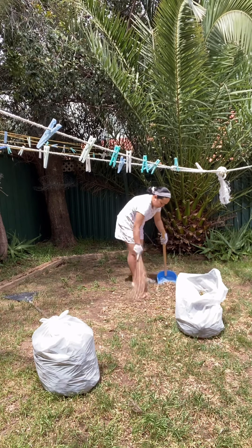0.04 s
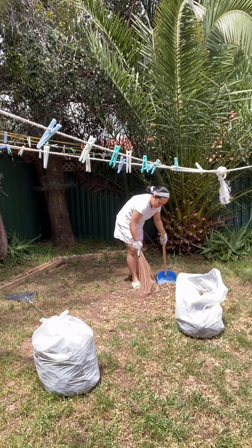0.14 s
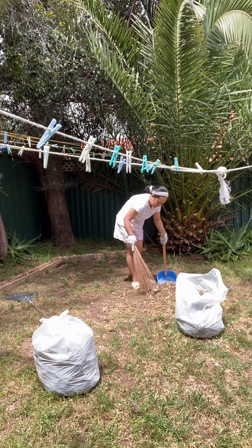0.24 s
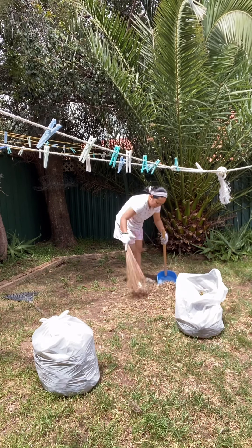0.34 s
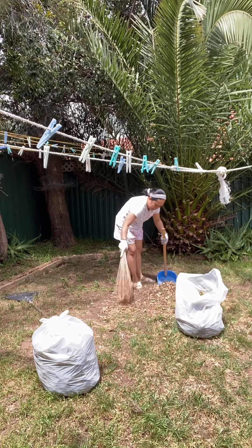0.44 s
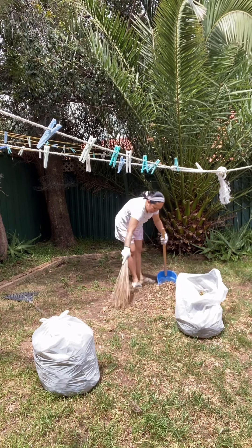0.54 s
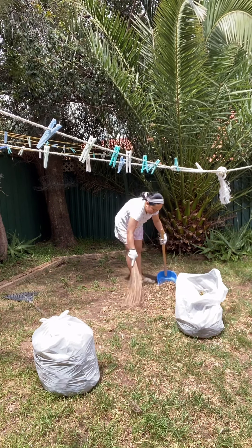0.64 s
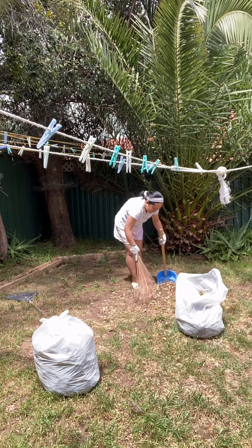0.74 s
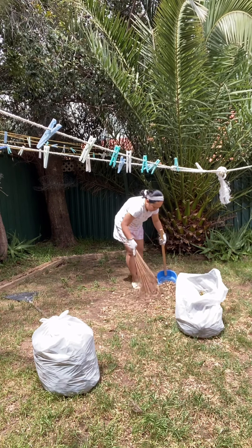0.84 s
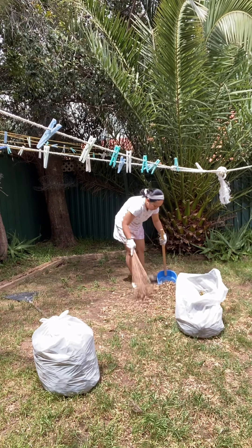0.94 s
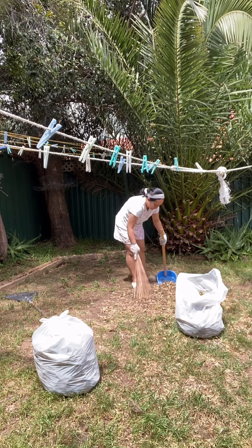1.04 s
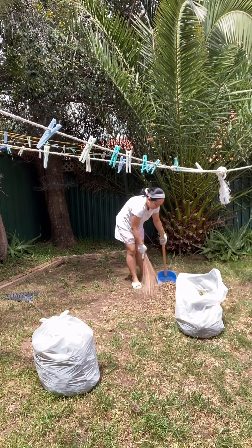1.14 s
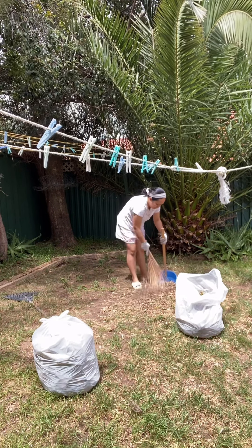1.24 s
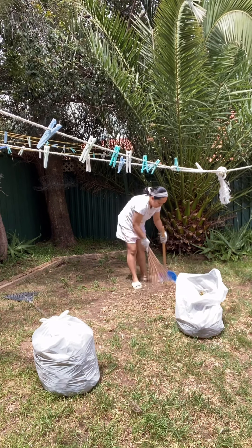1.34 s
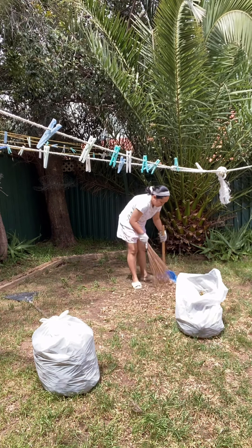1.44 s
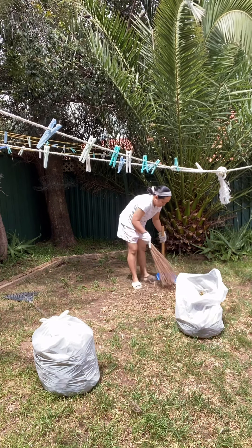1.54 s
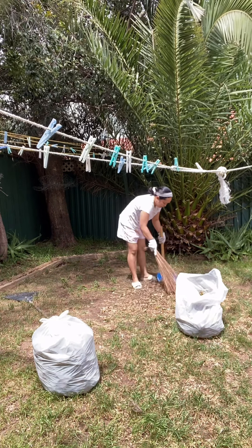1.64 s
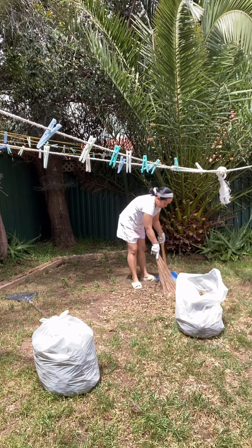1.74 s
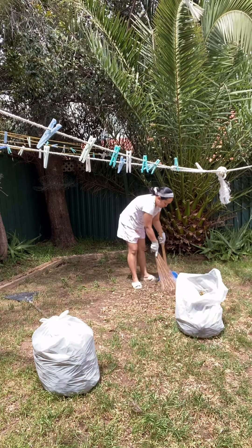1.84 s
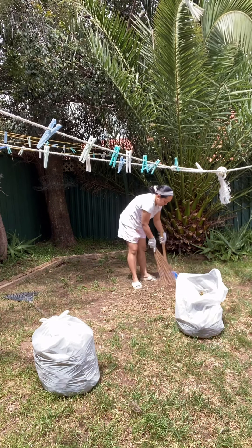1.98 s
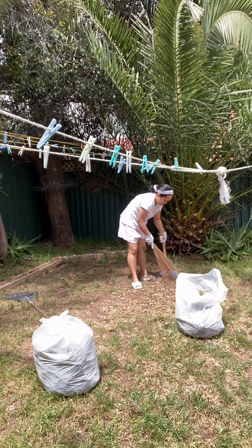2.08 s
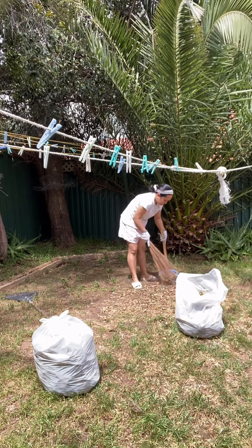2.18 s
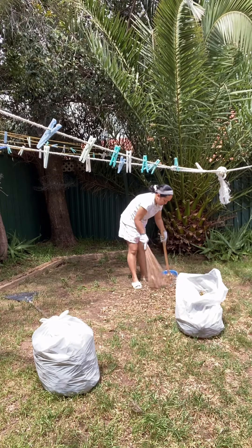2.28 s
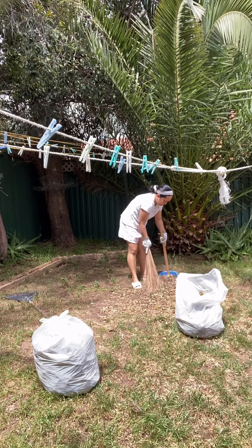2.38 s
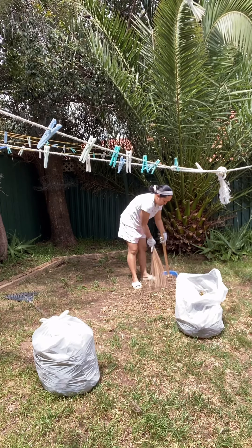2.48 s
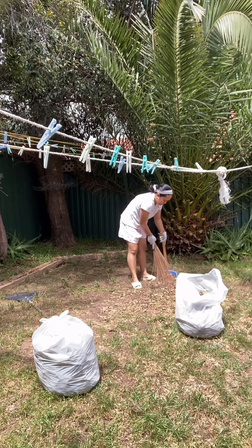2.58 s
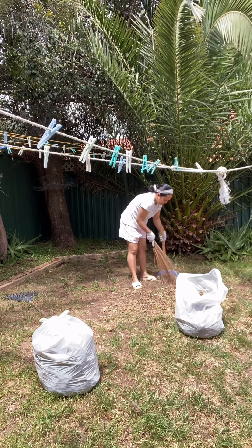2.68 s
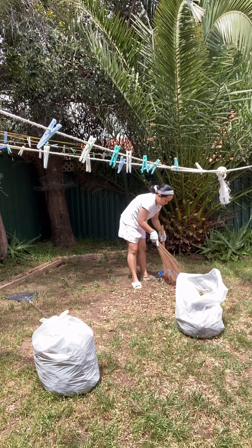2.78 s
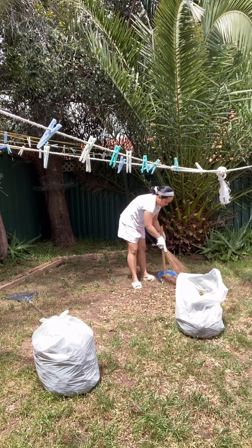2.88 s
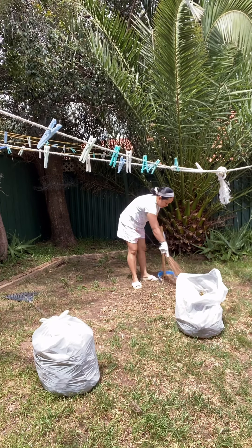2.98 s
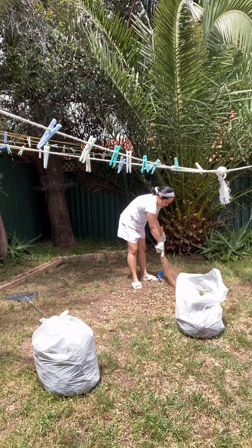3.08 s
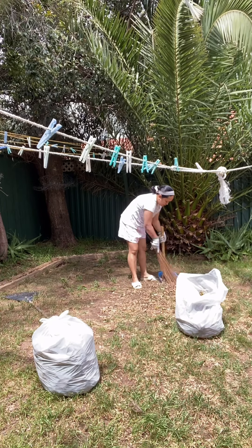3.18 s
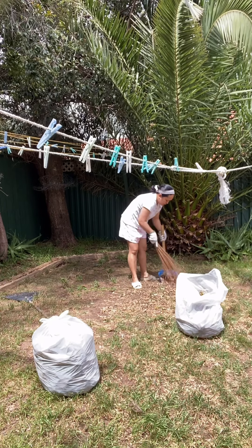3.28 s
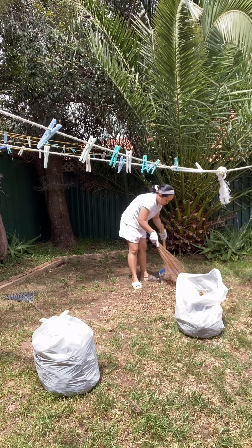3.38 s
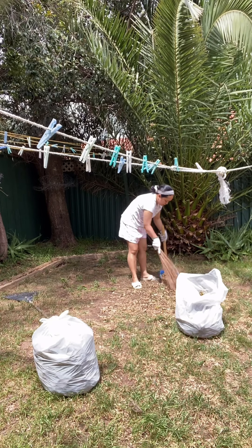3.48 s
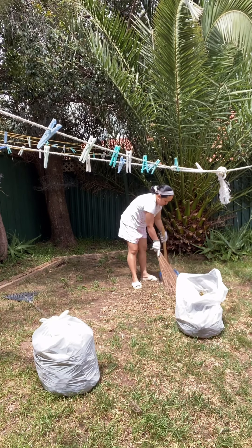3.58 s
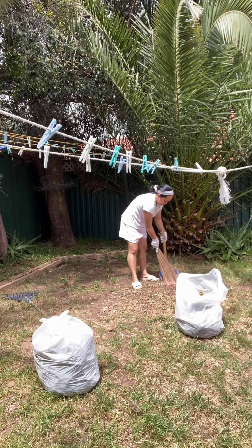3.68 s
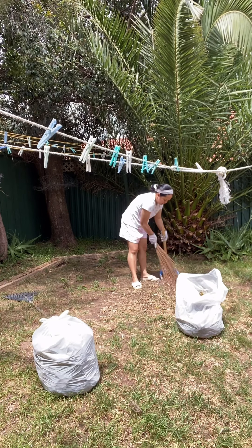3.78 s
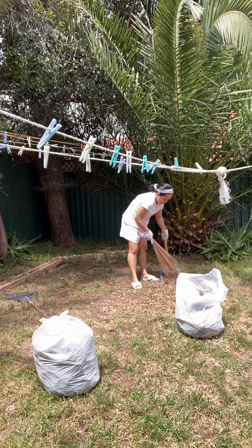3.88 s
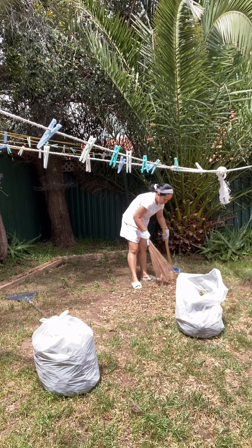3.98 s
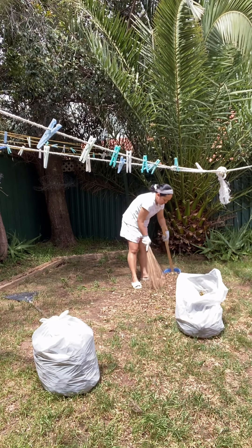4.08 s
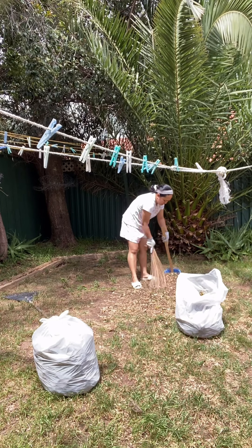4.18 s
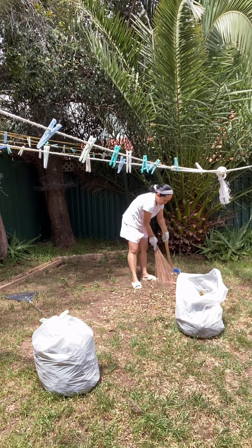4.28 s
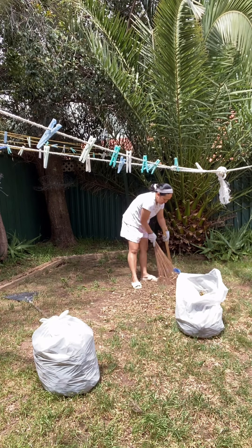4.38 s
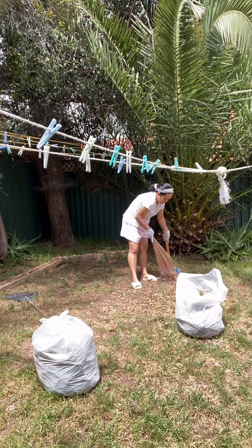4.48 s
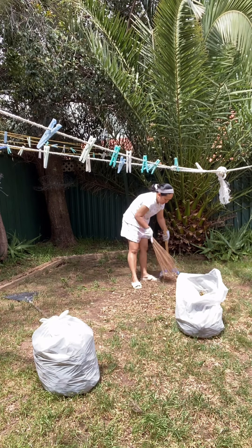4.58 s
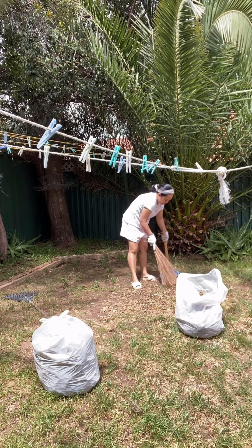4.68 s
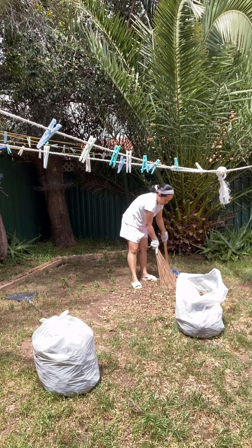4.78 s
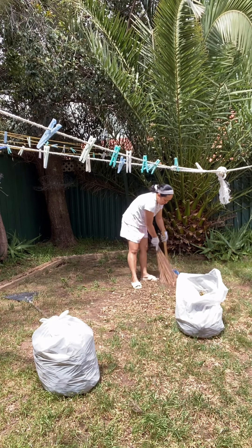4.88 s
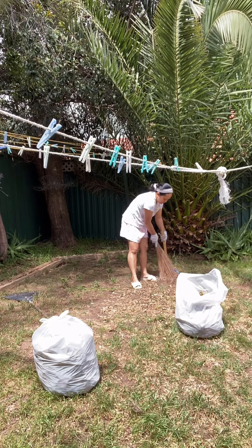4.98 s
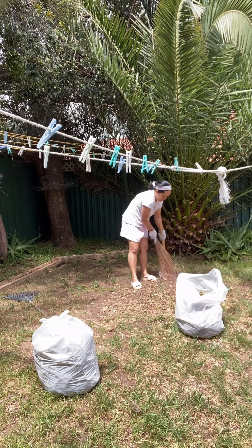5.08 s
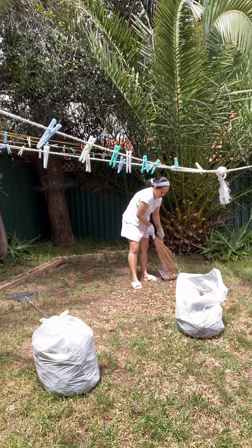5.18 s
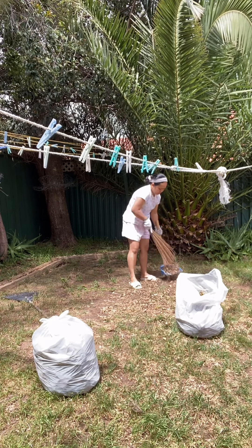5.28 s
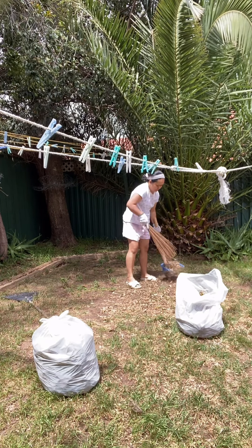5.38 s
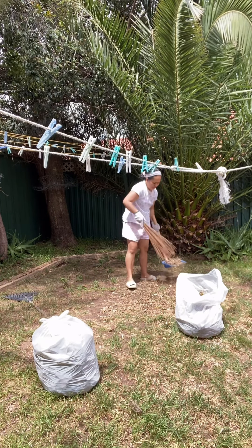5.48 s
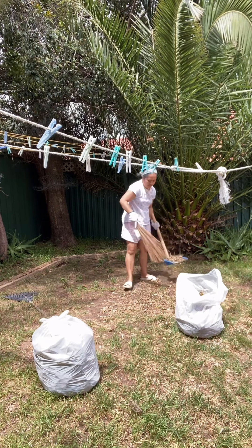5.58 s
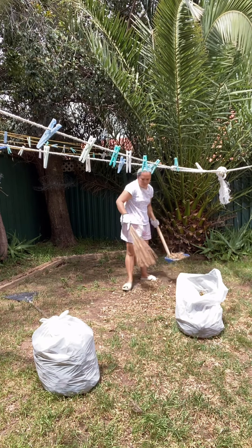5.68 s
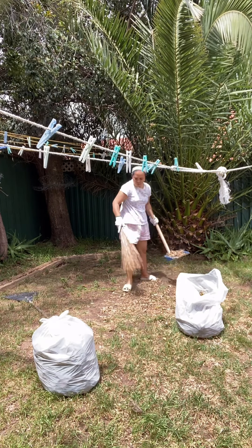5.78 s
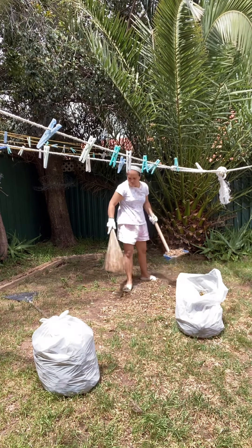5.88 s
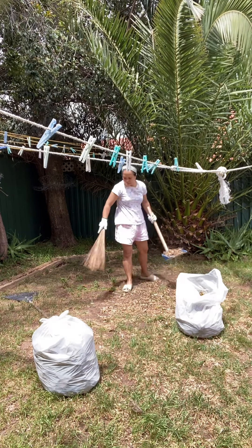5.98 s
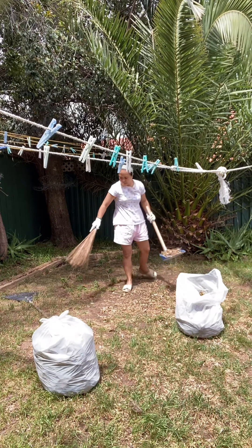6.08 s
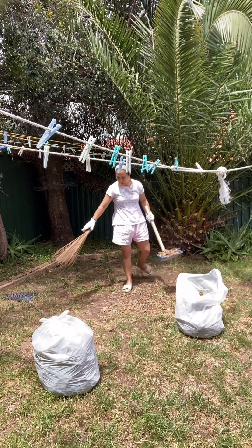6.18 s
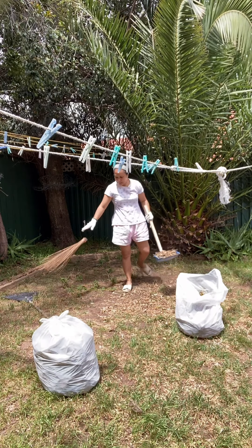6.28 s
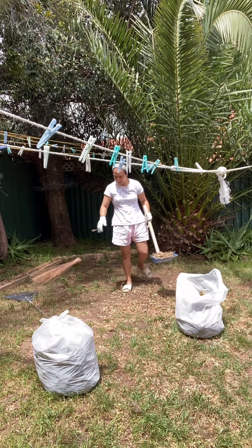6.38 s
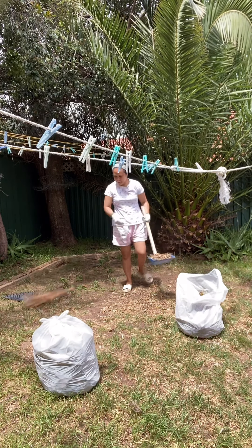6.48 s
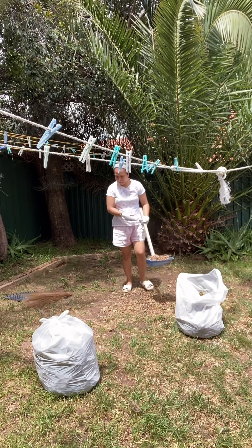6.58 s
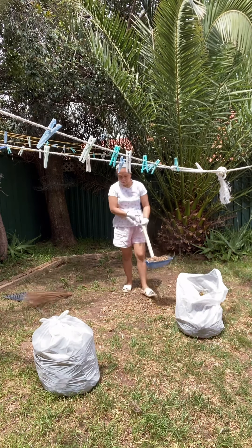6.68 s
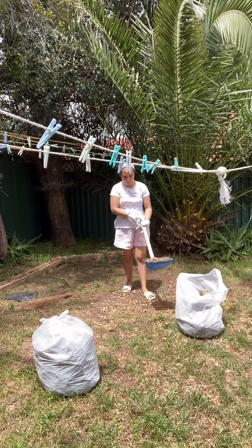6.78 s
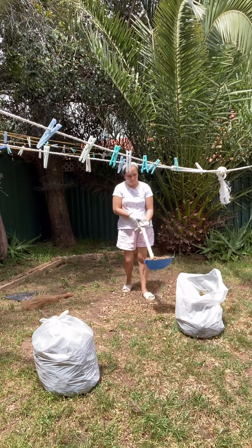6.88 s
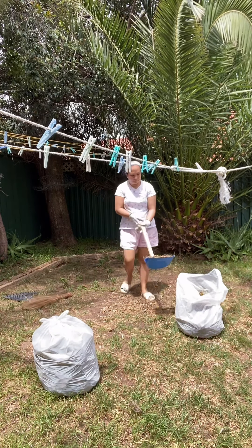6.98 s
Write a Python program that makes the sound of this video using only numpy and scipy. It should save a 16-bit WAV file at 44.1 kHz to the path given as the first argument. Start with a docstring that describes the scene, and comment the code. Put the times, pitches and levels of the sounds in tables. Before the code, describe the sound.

Stiff twig broom sweeps dry dirt and grass in uneven scratchy strokes, small birds chirping over distant engine rumble, then the broom drops with a clatter.

```python
"""A twig broom sweeps dry dirt and grass in a fenced yard: trains of tiny impacts make hiss, ring and rasp.
Twigs snap, broad objects scuff and knock on the soil, and at last the broom is tossed on the ground.
Small birds chirp in rising, fluttering near sines; a mower drones in harmonics of its blade rate.
Beyond them heavy engines beat against each other over the noise of the town.
Two closely spaced microphones hear it all slightly from the right."""
import sys
import numpy as np
from scipy import signal
from scipy.fft import rfft, irfft
from scipy.io import wavfile
from scipy.ndimage import map_coordinates

SR = 44100
rng = np.random.default_rng(int(sys.argv[2]) if len(sys.argv) > 2 else 0)


def dump(signal):
    """Clip the signal to [-1, 1] and save it as 16-bit WAV at the path in sys.argv[1]."""
    limited = np.clip(np.atleast_2d(signal).T, -1, 1)
    pcm = np.round(limited * 32767).astype(np.int16)
    wavfile.write(sys.argv[1], SR, pcm)


N = 310478
TIME = np.arange(N) / SR
FREQS = np.maximum(np.arange(N // 2 + 1) * SR / N, 1)

# Twigs brushing the ground. Each row: start, swell, hold and release in seconds, then the relative
# level of the hiss of the twig tips and of the rasp of pushed dirt, both in dB.
STROKES = [(-.06, 0.08, 0.065, 0.2, -30, -36), (0.556, 0.15, 0.074, 0.092, -23.5, -40),
           (0.975, 0.27, 0.035, 0.083, -26, -59), (1.352, 0.04, 0.031, 0.13, -34, -40),
           (1.599, .025, 0.068, 0.05, -38.5, -40.5), (1.645, 0.2, 0.23, 0.077, -28.5, -40.5),
           (2.29, 0.21, 0.096, 0.1, -29, -44), (2.727, 0.02, 0.026, 0.067, -39, -43),
           (2.953, 0.1, 0.12, 0.092, -29.5, -47), (3.452, 0.23, 0.024, 0.12, -28, -43),
           (4.07, 0.2, 0.057, 0.11, -29, -41), (4.704, 0.22, 0.011, 0.18, -27.5, -41.5),
           (5.408, 0.12, 0.13, 0.087, -47.5, -40), (5.793, 0.019, 0.018, 0.058, -57, -54),
           (6.469, 0.068, 0.007, 0.072, -28, -60), (6.722, 0.036, .02, 0.063, -41, -43),
           (6.954, 0.019, 0.0081, 0.039, -39, -54)]
# Spectrum of the twig tips. Each row: frequency in Hz, relative density in dB per Hz.
TIPS_SPECTRUM = [(400, -12), (1500, -4), (3000, -2), (5200, -1.3), (7000, .4), (12000, 0), (14000, -.2),
                 (15500, -1.3)]
# Spectrum of the pushed dirt. Each row: frequency in Hz, relative density in dB per Hz.
DIRT_SPECTRUM = [(150, -10), (400, 4), (800, 3), (1300, 0), (2300, 0), (4000, -5), (6500, -9), (12000, -22)]
# Spectrum of crackling leaves. Each row: frequency in Hz, relative density in dB per Hz.
LEAVES_SPECTRUM = [(150, 14), (600, -18), (1500, 4), (3000, 7), (5500, -12), (8000, 8.5), (12000, 6.5),
                   (15500, -7)]
# Likeness of the broom at the two microphones. Each row: frequency in Hz, likeness from -1 to 1.
BROOM_LIKENESS = [(300, .95), (1200, .55), (2800, .15), (3900, -.35), (4500, .35), (5100, .98), (5900, .98),
                  (7500, .75), (10300, .95), (13000, .7)]
# Stiff twigs that ring as they catch. Each row: frequency in Hz, width in Hz, relative level in dB.
TWIG_MODES = [(2300, 140, -3), (2780, 210, -5), (3190, 100, -10), (3630, 110, -2), (3923, 64, 5),
              (4200, 130, -2.5), (4390, 90, -1.5)]
# Ringing of the stiff twigs as the broom is held at one angle or another.
# Each row: time in seconds, relative level in dB.
TWIG_RING_LEVEL = [(0, -11.5), (.75, -9.5), (1.3, -9), (2.0, -6.5), (2.6, -8), (3.6, -7.5), (4.3, -7),
                   (5.0, -6), (7.04, -16)]
# Single twigs snap and grit is flicked away. Each row: time in seconds, peak in dB before filtering.
SNAPS = [(0.4454, -24), (0.504, -41), (0.858, -16), (0.99, -19), (1.0585, -17), (1.1438, -27), (1.607, -14),
         (1.8023, -20), (2.076, -9), (2.1842, -28), (2.9971, -23.5), (3.6174, -20), (3.998, -24),
         (4.8359, -16), (5.351, -31), (5.379, -30), (5.408, -33), (5.531, -31), (5.546, -27), (5.609, -25),
         (5.8096, -23), (5.82, -36), (6.092, -68), (6.1878, -45), (6.816, -11), (6.9686, -30),
         (6.9833, -30)]
# Dustpan and handle knocking on the ground. Each row: time in seconds, relative level in dB.
KNOCKS = [(1.609, -26), (1.636, -30), (1.675, -34), (1.718, -28), (1.756, -29.5), (1.997, -36),
          (5.836, -37), (6.511, -25)]
# What the knocks ring with. Each row: nominal frequency in Hz, relative level in dB, t60 in seconds.
KNOCK_MODES = [(480, -5, .035), (760, 0, .04), (1010, -4, .025), (1380, -1, .025), (1950, -4, .016),
               (2750, -4, .014), (3450, -4, .012), (4250, -3, .012)]
# Contacts of the tossed broom. Each row: start and rise in seconds, decay t60 in seconds, level in dB.
LANDINGS = [(6.4905, 0.0018, 0.081, -34), (6.502, .004, .05, -27), (6.5089, 0.0029, .045, -18),
            (6.515, .0015, 0.14, -14.5), (6.5222, .001, 0.045, -24), (6.5405, 0.0025, 0.18, -25.5),
            (6.596, .002, 0.27, -40)]
# The thickest twigs hitting the ground. Each row: time in seconds, relative peak in dB.
TWIG_HITS = [(6.5117, -15), (6.5148, -11), (6.5195, -6), (6.5335, -17)]
# Spectrum of the bundle crashing down. Each row: frequency in Hz, relative density in dB per Hz.
BUNDLE_SPECTRUM = [(150, 2), (450, 1), (750, -2), (1400, 1.5), (2200, 0), (3000, -2), (3700, 4), (4500, -4),
                   (5500, -17), (6800, 0), (8000, 5), (12000, 5.5), (15500, 3.5)]
# Sandals, dustpan and the flat of the broom scuffing the soil.
# Each row: time of the peak in seconds, length in seconds, hollow pitch in Hz, level in dB.
SCUFFS = [(.012, .07, 600, -26.5), (.02, .1, 2300, -30), (.04, .12, 370, -36), (.265, .1, 480, -33),
          (.80, .24, 440, -35), (1.62, .07, 750, -37), (1.73, .1, 780, -37), (1.73, .1, 350, -37),
          (2.04, .14, 760, -34.5), (2.62, .11, 760, -35), (2.78, .1, 790, -40), (3.57, .08, 720, -40),
          (4.89, .12, 3800, -33), (4.96, .1, 740, -37), (5.565, .06, 400, -30), (5.65, .12, 420, -34.5),
          (5.57, .3, 5000, -39.5), (5.56, .24, 9000, -39), (5.79, .2, 320, -36), (6.15, .1, 400, -37)]
# Bird chirps. Each row: start and length in seconds, first, middle and last pitch in Hz, relative level in dB.
CHIRPS = [(.39, .05, 2700, 3400, 4500, -44), (1.39, .045, 3200, 3900, 4400, -43),
          (1.578, .04, 3200, 4150, 4850, -35.5), (2.40, .042, 3400, 4250, 4800, -35),
          (3.393, .044, 2650, 3150, 4400, -38), (3.472, .04, 3300, 4300, 4900, -33),
          (4.035, .046, 2700, 4050, 4700, -33.5), (4.462, .044, 3100, 4200, 4850, -34),
          (4.912, .042, 4150, 4650, 4980, -24.5), (5.175, .06, 3750, 3950, 4100, -37),
          (5.24, .055, 3800, 4300, 4850, -29), (5.672, .05, 4100, 4450, 5050, -26),
          (5.71, .047, 2500, 3450, 4600, -32), (5.935, .035, 3200, 3350, 3500, -41),
          (5.975, .057, 3400, 3800, 4350, -37), (6.026, .02, 4500, 5350, 5550, -41),
          (6.44, .032, 2950, 3300, 3750, -35), (6.464, .034, 3900, 4450, 4950, -27),
          (6.825, .05, 3900, 4530, 4950, -25)]
# A lower note with a strong octave leads into the loudest chirps.
# Each row: start and length in seconds, first and last pitch in Hz, relative level in dB.
LEAD_INS = [(4.878, .044, 2520, 3200, -31), (5.655, .028, 2650, 3250, -29.5),
            (6.795, .054, 2600, 3480, -28)]
# Chirps coming back from fences and walls. Each row: delay in seconds, level in dB.
BIRD_ECHOES = [(.006, -14), (.022, -13), (.043, -17)]
# Lag of the birds at the left microphone; low notes come round by a longer way.
# Each row: frequency in Hz, lag in samples.
BIRD_LAG = [(3200, 5.7), (4000, 3.1), (4900, 2.9), (5500, 3.9)]
# Blade rate of the mower. Each row: time in seconds, nominal rate in Hz.
MOWER_RATE = [(0, 125), (.6, 123.3), (2, 123.3), (3.1, 122), (4.4, 122.2), (4.9, 122.8), (6.5, 121.9),
              (7.04, 122.5)]
# Mower hum, each harmonic fading on its own way through the gardens.
# Each row: time in seconds, mean level in dB of twice, three times and four times the blade rate.
HUM_LEVEL = [(0, -36.5, -40, -39), (.6, -43, -50, -51), (1.1, -47.5, -59, -49), (1.55, -37, -50, -42),
             (2.1, -32.5, -43.5, -41), (2.7, -37.5, -41.5, -37), (3.1, -40.5, -48, -43),
             (3.55, -38.5, -38, -42), (4.0, -40, -37.5, -35.5), (4.4, -36, -37.5, -40.5),
             (4.65, -36.5, -61, -43), (5.2, -37.5, -42, -44.5), (5.7, -37.5, -36, -42),
             (6.2, -40.5, -46, -32), (6.7, -36.5, -40.5, -46), (7.04, -32.5, -44, -31)]
# Spectrum of the blade's whine. Each row: frequency in Hz, relative level in dB.
WHINE_SPECTRUM = [(500, -39), (620, 0.5), (900, 3.5), (1100, 1), (1250, 8), (1600, 8), (1850, 4.5),
                  (2300, 0.5), (2700, -4), (4500, -68)]
# Level of the blade's whine. Each row: time in seconds, relative level in dB.
WHINE_LEVEL = [(0, -44), (2.2, -43), (2.7, -37), (3.6, -35.5), (4.3, -34), (4.65, -42.5), (5.2, -33.5),
               (6.2, -33.5), (7.04, -34)]
# The slower heavy engine. Each row: time in seconds, nominal firing rate in Hz, relative level in dB.
SLOW_ENGINE = [(0, 55.75, -24), (.5, 54.23, -21), (1.05, 56.7, -26.5), (1.17, 57, -37), (3.2, 56.5, -36),
               (4.3, 54.5, -25.5), (5.1, 55.85, -31), (5.9, 57.06, -26), (6.4, 58, -30.5),
               (7.04, 57.93, -44)]
# The faster heavy engine. Each row: time in seconds, nominal firing rate in Hz, relative level in dB.
FAST_ENGINE = [(0, 62, -40), (1.15, 63.3, -38), (1.35, 62.07, -29.5), (2.0, 61.84, -26), (2.5, 66.4, -28.5),
               (3.2, 70.14, -35), (3.7, 70.8, -26.5), (4.1, 64.84, -28), (4.9, 64.7, -32),
               (5.35, 68.5, -28.5), (6.3, 69.56, -35.5), (6.75, 64.1, -27.5), (6.88, 63.2, -17.5),
               (7.04, 64.5, -19.5)]
# Drones of other vehicles.
# Each row: start and length in seconds, middle pitch in Hz, glide in Hz per second, mean peak level in dB.
DRONES = [(1.0, 1.6, 194, 0, -39.5), (2.602, 1.07, 95.7, 1, -31), (3.292, 1.18, 142.3, -3.5, -34),
          (3.797, 2.26, 97, -.5, -31), (4.009, 1.66, 190, 1.5, -42.5), (5.498, 0.676, 85.7, 4.5, -33),
          (6.144, 0.51, 186.8, 14.5, -34), (6.341, 0.59, 256, 15, -32)]
# Spectrum of the town noise. Each row: frequency in Hz, relative density in dB per Hz.
TOWN_SPECTRUM = [(20, -22), (32, -2), (60, -1), (82, 0), (110, -4.5), (170, -11), (300, -12), (500, -15),
                 (1000, -21), (2000, -25), (2800, -33), (3500, -38), (4400, -38), (6200, -55), (15000, -65)]
# Left-right likeness of the distant noise. Each row: frequency in Hz, likeness from -1 to 1.
TOWN_LIKENESS = [(60, 1), (130, 1), (250, 0.97), (600, 0.84), (1200, 0.53), (2000, 0.99), (3000, 0.045),
                 (6000, 1), (12000, 0.94)]
# Level of the distant town. Each row: time in seconds, level in dB.
TOWN_LEVEL = [(0, -29), (.6, -30.5), (3, -30), (4.7, -30), (7.04, -28.5)]

TRAIL_DB, TRAIL_FALL_DB_PER_S = -9.5, 35.5   # loose litter keeps rustling after a stroke
DIRT_FOLLOWS = 0.66   # share of the stroke's swing in dB that the dirt follows
GRAZE_DB, GRAZE_END_S, GRAZE_FADE_S = -46.5, 5.47, 1.38   # tips graze the grass until the broom is lifted
CRACKLES_PER_S, CRACKLE_DB = 170, -9   # dry leaves and coarse grit caught by the twigs
TIPS_PATCHY_DB = 1.47   # each bunch of twigs colours the hiss in its own way
TWIG_BEND = .035   # typical share by which the pitch of the twigs wanders as they bend
TWIG_COMING_AND_GOING_DB = 6
OCTAVE_DB = -1   # octave of a lead-in note, relative to the note
HUM_FADING_DB = 0.8
LEFT_LAG_SAMPLES = 4.19   # the sound reaches the left microphone later
CUTOFF_HZ = 14600


def from_db(db):
    """Logarithmic level: twenty decibels are a factor of ten in amplitude."""
    return 10 ** (np.asarray(db) / 20)


def rms_one(x):
    """Normalisation of power: scale to rms 1."""
    return x / np.sqrt(np.mean(x ** 2) + 1e-20)


def in_time(rows):
    """Linear interpolation: the columns of a curve at every sample."""
    times, *columns = np.transpose(rows)
    return [np.interp(TIME, times, column) for column in columns]


def at_hz(points):
    """Interpolation over log frequency, at every frequency of the spectrum."""
    hz, value = np.transpose(points)
    return np.interp(np.log(FREQS), np.log(hz), value)


def drift(rate):
    """Low-passed noise: smooth chance of spread 1 that changes about rate times a second."""
    step = 40   # samples between slow values
    pole = np.exp(-2 * np.pi * rate * step / SR)
    noise = rng.standard_normal(N // step + 2002)
    slow = signal.lfilter([1], [1, -2 * pole, pole * pole], noise)[2000:]   # settled part only
    return np.interp(np.arange(N) / step, np.arange(len(slow)), rms_one(slow))


def turning(hz):
    """Phase as the integral of frequency, from a random start."""
    return 2 * np.pi * np.cumsum(hz) / SR + rng.uniform(0, 2 * np.pi)


def later(x, lag):
    """Propagation delay by a number of samples, which may change."""
    return map_coordinates(x, [np.arange(N) - lag], order=5, mode="mirror")


def spread(pair, spectrum, likeness):
    """Partial coherence: two unrelated signals, coloured and blended into a partly alike pair of rms 1."""
    mid, side = rfft(pair) * from_db(at_hz(spectrum))
    alike = np.clip(at_hz(likeness), -.9999, .9999)
    common = np.sqrt(1 + alike) * mid
    opposed = np.sqrt(1 - alike) * side * [[1], [-1]]
    return rms_one(irfft(common + opposed, N))


def contacts(per_s, size_db):
    """Shot noise: two trains of random impacts, most weak and a few strong; even power at any rate."""
    chance = np.clip(per_s / SR, 1e-3, 1)
    sizes = from_db(size_db * np.minimum(rng.exponential(1, (2, N)), 6))
    hits = rng.random((2, N)) < chance
    return hits * sizes * rng.choice([-1, 1], (2, N)) / np.sqrt(chance)


def blow(start, rise, t60):
    """Impact envelope: a quick linear rise, then exponential decay."""
    age = TIME - start
    return np.clip(age / rise, 0, 1) * from_db(-60 * np.clip((age - rise) / t60, 0, 3))


def yard(x, t60, wet_db):
    """Diffuse scattering from fence and foliage: a decaying noise tail, different at each microphone."""
    t = TIME[:SR // 2]
    tail = rng.standard_normal((2, len(t))) * from_db(-60 * t / t60) * (t > .004)
    tail /= np.sqrt(np.sum(tail ** 2, axis=1, keepdims=True))
    scatter = signal.fftconvolve(x[None], tail, axes=1)[:, :N]
    return x + from_db(wet_db) * scatter


def stroke_levels():
    """Friction envelopes: pressure swells, holds and lets go, and loose litter trails on."""
    effort = from_db(GRAZE_DB) * np.clip((GRAZE_END_S - TIME) / GRAZE_FADE_S, 0, 1)
    rasp = np.zeros(N)
    for start, swell, hold, release, tips_db, dirt_db in STROKES:
        pressing = np.sin(np.pi / 2 * np.clip((TIME - start) / swell, 0, 1)) ** 1.36
        lifted = np.maximum(TIME - start - swell - hold, 0)
        letting_go = np.exp(-(lifted / release) ** 1.15)
        trail = from_db(TRAIL_DB - TRAIL_FALL_DB_PER_S * lifted)
        stroke = pressing * np.maximum(letting_go, trail)
        effort = np.maximum(effort, from_db(tips_db) * stroke)
        rasp = np.maximum(rasp, from_db(dirt_db) * stroke ** DIRT_FOLLOWS)
    return effort, rasp


def sweeping():
    """Contact noise: tips flick over grit and ring, more often the harder the stroke; pushed dirt rasps lower."""
    effort, rasp = stroke_levels()
    per_s = 3500 + 22000 * effort / effort.max()

    hiss = spread(contacts(per_s, size_db=0.0), TIPS_SPECTRUM, BROOM_LIKENESS)
    tips = patchy(hiss, TIPS_PATCHY_DB) * effort * from_db(4.5)

    ring = twig_ring(per_s / 10) * effort * from_db(in_time(TWIG_RING_LEVEL)[0])

    crackle = spread(contacts(CRACKLES_PER_S, size_db=0.5), LEAVES_SPECTRUM, BROOM_LIKENESS)
    crackle = crackle * effort * from_db(CRACKLE_DB)

    dirt = spread(contacts(per_s / 2, size_db=2.0), DIRT_SPECTRUM, BROOM_LIKENESS)
    dirt = dirt * rasp * from_db(4.5 + 1.0 * drift(21))

    catching = from_db(0.48 * drift(26))   # bunches of twigs catch and let go together
    return catching * (tips + ring + crackle + dirt)


def patchy(pair, depth_db):
    """Independent band modulation: neighbouring bands swell and sink on their own; rms 1."""
    centres_hz = np.linspace(1500, 14000, 8)
    spectrum = rfft(pair)
    out = 0
    for share in np.eye(len(centres_hz)):
        band = irfft(spectrum * np.interp(FREQS, centres_hz, share), N)
        out = out + band * from_db(depth_db * drift(33))
    return rms_one(out)


def twig_ring(per_s):
    """Resonance: each twig is flicked by its own train of contacts and rings, now one louder, now another."""
    out = 0
    for hz, width_hz, db in TWIG_MODES:
        b, a = signal.iirpeak(hz, hz / width_hz, fs=SR)
        ringing = signal.lfilter(b, a, contacts(per_s, size_db=3.5))
        out = out + ringing * from_db(db + TWIG_COMING_AND_GOING_DB * np.tanh(drift(5.2)))
    bending = np.cumsum(TWIG_BEND * drift(4))   # a changing delay shifts the pitch
    out = np.array([later(x, bending) for x in out])
    out = signal.sosfilt(signal.butter(2, [2000, 4800], "band", fs=SR, output="sos"), out)
    return spread(out, TIPS_SPECTRUM, BROOM_LIKENESS)


def snaps():
    """Sudden elastic release: a twig springs free with a bright crack of a few milliseconds."""
    clicks, t = np.zeros(N), TIME[:SR // 50]
    for start, db in SNAPS:
        crack = rng.standard_normal(len(t)) * from_db(-60 * t / 0.0072)
        clicks[round(start * SR):][:len(t)] += from_db(db) * crack / np.abs(crack).max()
    bright = signal.sosfilt(signal.butter(1, 900, "high", fs=SR, output="sos"), clicks)
    return yard(bright, t60=0.065, wet_db=-0.5)


def knocks():
    """Modal excitation: a hard, dull knock strikes every mode with a strength of its own."""
    out, t = np.zeros(N), TIME[:SR // 10]
    for start, db in KNOCKS:
        for hz, mode_db, t60 in KNOCK_MODES:
            strength = from_db(db + mode_db + rng.normal(0, 2)) * rng.choice([-1, 1])
            mode = np.sin(2 * np.pi * hz * rng.uniform(0.95, 1.04) * t) * from_db(-60 * t / t60)
            out[round(start * SR):][:len(t)] += strength * mode
    return yard(out, t60=.08, wet_db=-8)


def broom_drop():
    """Multiple impact: tips touch, the bundle crashes with hard cracks and bounces, the handle thuds on soil."""
    landing = sum(from_db(db) * blow(start, rise, t60) for start, rise, t60, db in LANDINGS)
    cracks = sum(from_db(db - 9) * blow(start, rise=.0002, t60=0.0074) for start, db in TWIG_HITS)
    slap = spread(contacts(9000, size_db=1.5), BUNDLE_SPECTRUM, BROOM_LIKENESS) * (landing + cracks)
    thud = np.sin(turning(np.full(N, 132.0))) * blow(6.514, rise=0.0092, t60=0.1)
    return slap + from_db(-14.5) * thud


def near_echo(pair, delay, db):
    """Comb filtering: one close reflection ripples the spectrum; its path wanders as the broom moves."""
    lag = SR * delay * (1 + 0.055 * drift(0.92))
    echo = np.array([later(x, lag) for x in pair])
    return (pair + from_db(db) * echo) / np.hypot(1, from_db(db))


def scuffs():
    """Stick and slip: something broad drags over the soil, dense slips in one broad, hollow resonance."""
    out = np.zeros((2, N))
    common, opposed = contacts(2300, size_db=1.5)
    slips = common + 0.28 * opposed * [[1], [-1]]
    for peak_s, length, hz, db in SCUFFS:
        hollow = signal.butter(2, [hz / 1.28, hz * 1.28], "band", fs=SR, output="sos")
        swell = np.cos(np.pi * np.clip((TIME - peak_s) / length, -.5, .5))
        out += from_db(db) * swell * rms_one(signal.sosfilt(hollow, slips))
    return out


def birds():
    """Frequency modulation: each chirp is a fluttering near sine that glides and swells; the trees ring on."""
    song = np.zeros(N)
    waver, flutter = drift(280), from_db(2 * drift(130))

    def add(start, length, pitches_hz, db):
        """Polynomial glide: one note bent smoothly through its pitches."""
        at = np.arange(round(start * SR), min(round((start + length) * SR), N))
        along = np.linspace(0, 1, len(at))
        swell = flutter[at] * np.sin(np.pi * along ** 1.15).clip(0) ** 1.2
        bend = np.polyfit(np.linspace(0, 1, len(pitches_hz)), pitches_hz, len(pitches_hz) - 1)
        pitch_hz = np.polyval(bend, along) * (1 + .009 * waver[at])
        song[at] += from_db(db) * rms_one(swell * np.sin(turning(pitch_hz)))

    for start, length, *pitches_hz, db in CHIRPS:
        add(start, length, pitches_hz, db)
    for start, length, first_hz, last_hz, db in LEAD_INS:
        add(start, length, [first_hz, last_hz], db)
        add(start, length, [2 * first_hz, 2 * last_hz], db + OCTAVE_DB)
    echoes = sum(from_db(db) * np.interp(TIME - delay, TIME, song) for delay, db in BIRD_ECHOES)
    return from_db(-3.2) * yard(song + echoes, t60=.5, wet_db=-7.5)


def mower():
    """Periodic source: low harmonics of the blade rate, a buzz above, and a puff of air at every blade pass."""
    rate_hz, = in_time(MOWER_RATE)
    whine_db, = in_time(WHINE_LEVEL)
    phase = turning(rate_hz * (1 + 0.001568 * drift(13.27)))

    hum = 0
    for k, db in enumerate(in_time(HUM_LEVEL), 2):
        harmonic = np.sin(k * phase + rng.uniform(0, 2 * np.pi))
        hum = hum + from_db(db + HUM_FADING_DB * drift(2.4)) * harmonic

    buzz = 0
    for k in range(5, 20):   # each partial fades and shifts on its way through the air
        buzz = buzz + from_db(2.7 * drift(2.09)) * np.cos(k * phase + 0.76 * drift(3.8))
    buzz = rms_one(irfft(rfft(buzz) * from_db(at_hz(WHINE_SPECTRUM)), N))
    buzz = from_db(-5.5) * yard(buzz, t60=0.84, wet_db=-4.5)

    pulsed_air = rng.standard_normal((2, N)) * np.exp(0.5 * np.cos(phase))
    puffs = from_db(-5.0) * spread(pulsed_air, WHINE_SPECTRUM, TOWN_LIKENESS)
    return hum + from_db(whine_db) * (buzz + puffs)


def engine(curve, gain_db, wobble):
    """Firing note of a far engine: a sine a little unsteady in level and pitch."""
    rate_hz, db = in_time(curve)
    uneven = from_db(1.8 * drift(11))
    return from_db(db + gain_db) * uneven * np.sin(turning(rate_hz * (1 + wobble * drift(14.8))))


def drones():
    """Gliding tones: fainter vehicle notes that swell and fade."""
    out = 0
    for start, length, hz, glide, db in DRONES:
        along = np.clip((TIME - start) / length, 0, 1)
        pitch_hz = (hz + glide * length * (along - .5)) * (1 + 0.0054 * drift(4.9))
        level = np.sin(np.pi * along) * from_db(db + 1.2 * drift(7.5))
        out = out + level * np.sin(turning(pitch_hz))
    return out


def town():
    """Superposition of many far sources: coloured noise, partly alike at the two microphones."""
    level_db, = in_time(TOWN_LEVEL)
    return from_db(level_db) * spread(rng.standard_normal((2, N)), TOWN_SPECTRUM, TOWN_LIKENESS)


def traffic():
    """Beating and superposition: two uneven heavy engines, fainter drones and the wash of the town."""
    slow = engine(SLOW_ENGINE, gain_db=0.1, wobble=0.02)
    fast = engine(FAST_ENGINE, gain_db=2.5, wobble=0.041)
    return slow + fast + drones() + town()


def ports(pair, lag):
    """Time difference of arrival: the left microphone hears it a moment after the right."""
    return np.array([later(pair[0], lag), pair[1]])


def bird_ports(pair):
    """Dispersive delay: the birds reach the left microphone later by a lag that depends on pitch."""
    turn = np.exp(-2j * np.pi * FREQS * at_hz(BIRD_LAG) / SR)
    return np.array([irfft(rfft(pair[0]) * turn, N), pair[1]])


def scene():
    """Superposition: broom and neighbourhood share one arrival lag, the birds have their own."""
    broom = near_echo(sweeping() + snaps() + knocks() + broom_drop(), delay=0.0014, db=-17.0)
    return ports(broom + scuffs() + mower() + traffic(), LEFT_LAG_SAMPLES) + bird_ports(birds())


def record(dry):
    """Band limiting: a steep elliptic low-pass cuts the top."""
    return signal.sosfilt(signal.ellip(10, .2, 80, CUTOFF_HZ, fs=SR, output="sos"), dry)


dry = scene()
out = record(dry)
dump(out)
```